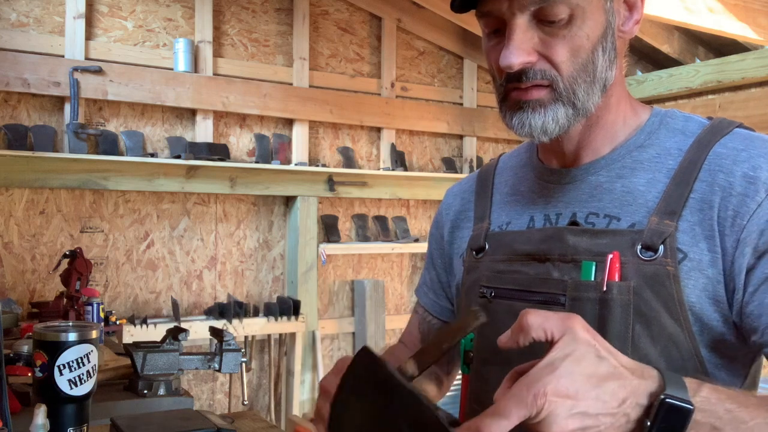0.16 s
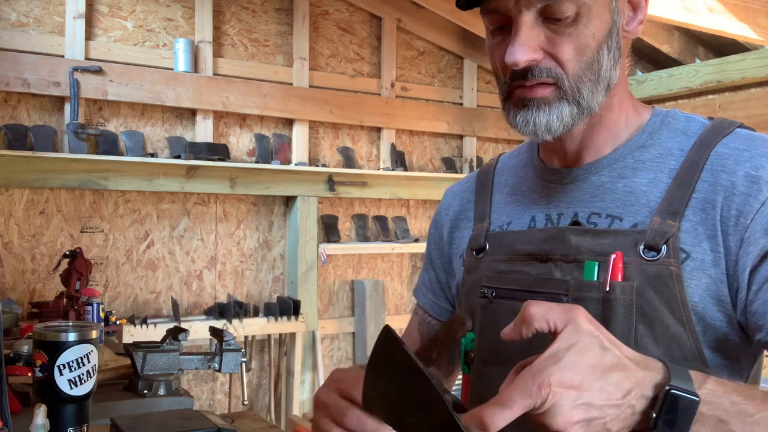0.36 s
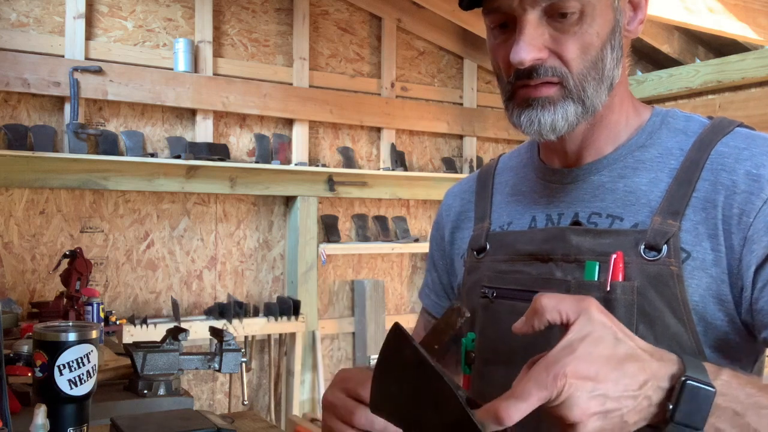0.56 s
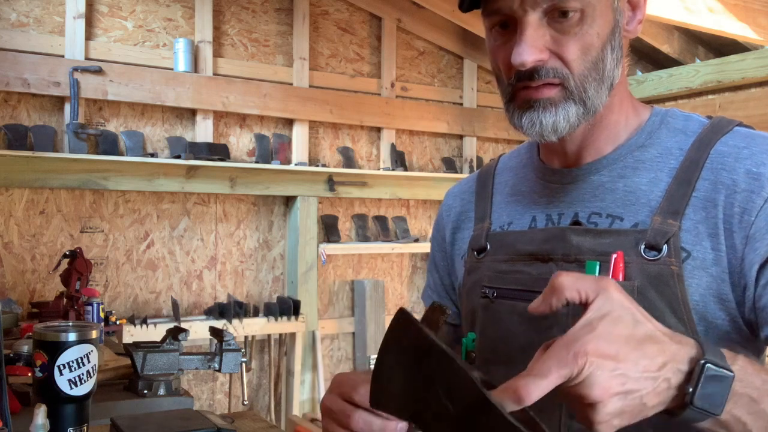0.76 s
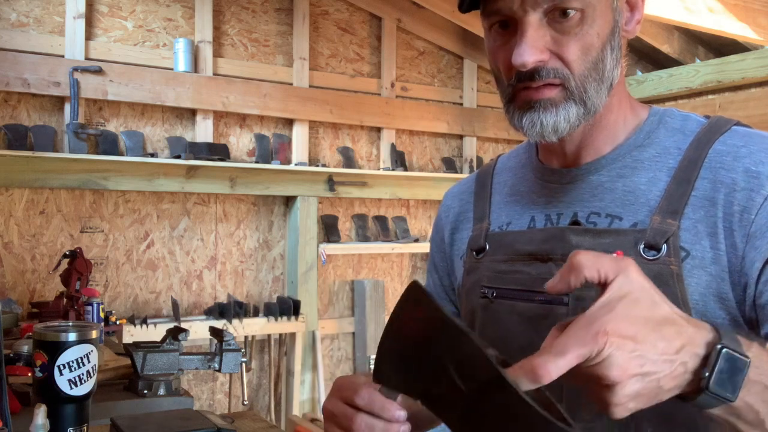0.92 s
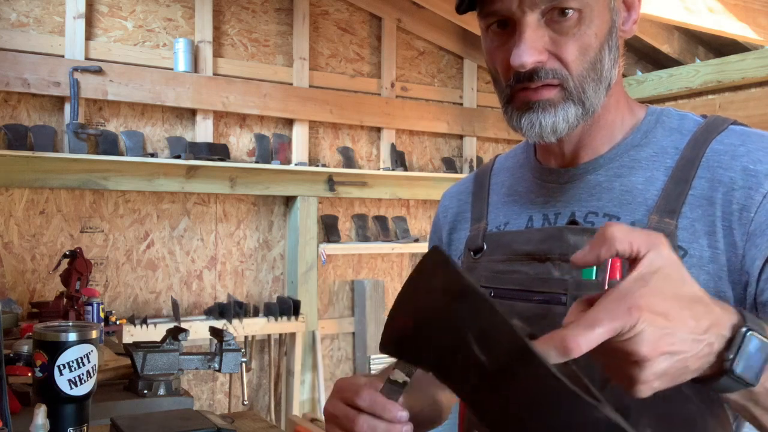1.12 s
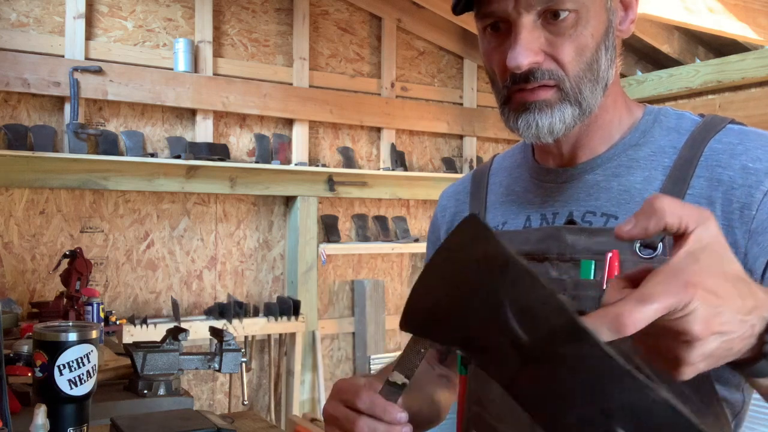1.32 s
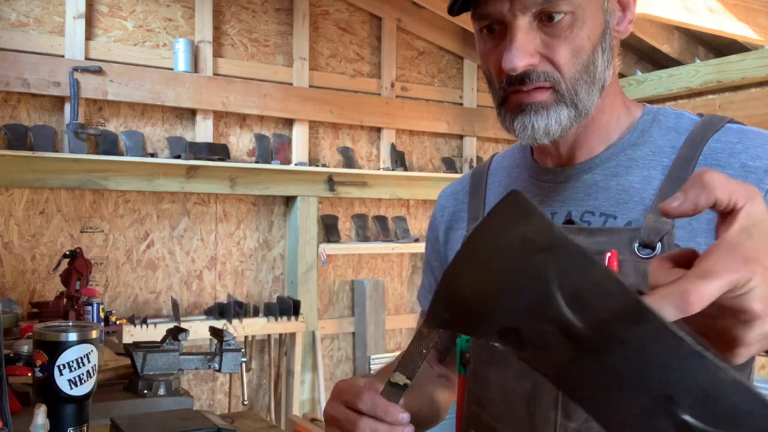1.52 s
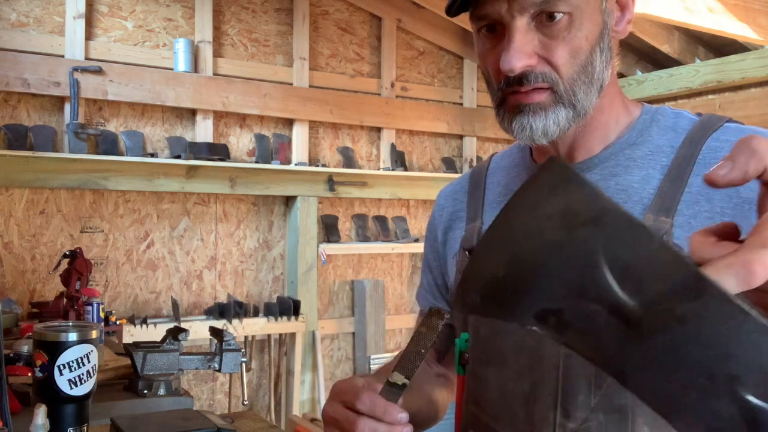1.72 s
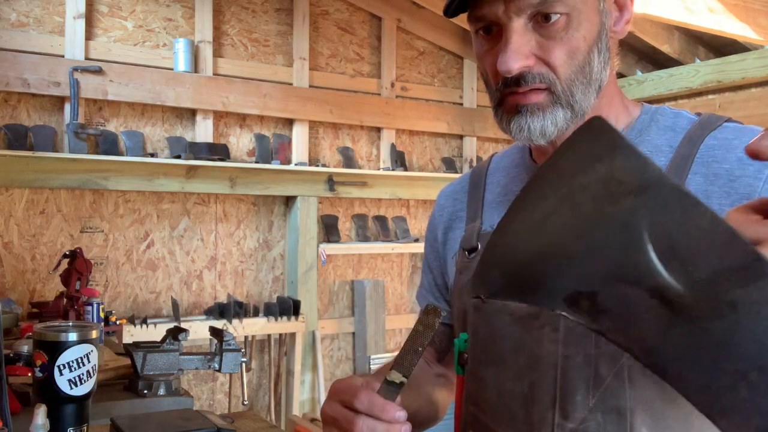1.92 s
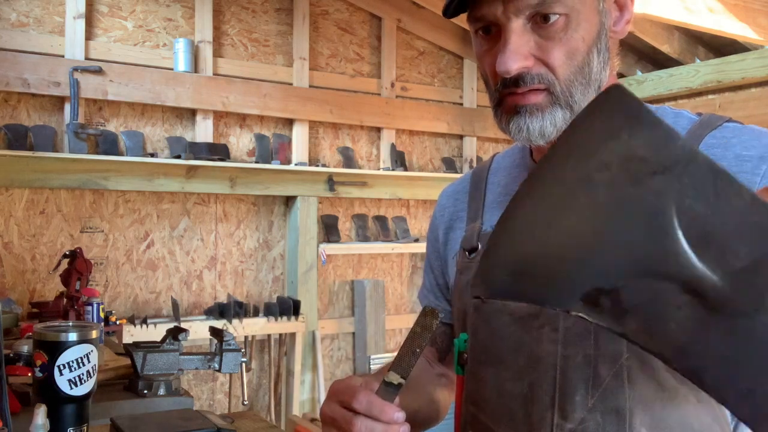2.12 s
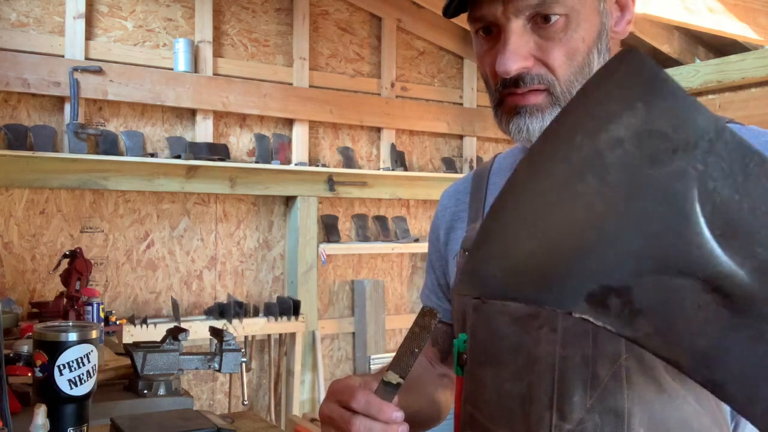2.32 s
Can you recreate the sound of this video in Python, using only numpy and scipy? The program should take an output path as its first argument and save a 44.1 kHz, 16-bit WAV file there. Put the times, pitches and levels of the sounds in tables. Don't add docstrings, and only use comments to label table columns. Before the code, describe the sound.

A bare steel axe head rings from a single fingernail flick. Low workshop rumble, hum and the last trace of an older ring come first. A brief rising scrape ends in a crisp crack at 0.2 seconds. Bright overtones die quickly, damped after 0.55; one pure high tone swells around 0.7, dips near 1.1, then wavers and shifts sideways, fading. Cloth brushes softly at 2.1.

```python
import sys
import numpy as np
from scipy import signal
from scipy.fft import rfft, irfft
from scipy.io import wavfile
from scipy.ndimage import uniform_filter1d

SR = 44100
rng = np.random.default_rng(int(sys.argv[2]) if len(sys.argv) > 2 else 0)


def dump(signal):
    limited = np.clip(np.atleast_2d(signal).T, -1, 1)
    pcm = np.round(limited * 32767).astype(np.int16)
    wavfile.write(sys.argv[1], SR, pcm)


def boost(x):
    u = np.asarray(x, float) / 20
    return 10 ** u


N = 110250
T = np.arange(N) / SR
SIDES = np.array([[.5], [-.5]])
STRIKE_S, CONTACT_S = .2172, 0.0004

# (centre [Hz], width [Hz], crack level [dB], tail level [dB], tail t60 [s])
CROWDS = [(171.1, 140, -33.5, -65.5, .08), (549, 60, -58, -69, 0.21), (1279.4, 440, -46, -55, .35),
          (2030, 400, -37.5, -49.5, .4), (2950, 300, -34.5, -56, 0.66), (4534, 450, -26, -38.5, 0.551),
          (5520, 430, -27, -46.5, 0.64), (6564, 600, -24, -45, .52), (7300, 410, -24.5, -45.5, 0.52),
          (9440, 730, -23, -38, .3), (10700, 400, -25, -47, 0.16), (11500, 540, -20.5, -46, .2),
          (13100, 800, -21.5, -42, 0.18), (14100, 400, -36, -48.5, 0.14), (14900, 1000, -41, -82.5, .02)]


def rms_one(x):
    return x / np.sqrt(np.mean(x ** 2) + 1e-20)


def in_time(rows, smooth_s=0.038):
    s, *columns = np.transpose(rows)
    return [uniform_filter1d(np.interp(T, s, c), size=int(smooth_s * SR)) for c in columns]


def at_hz(points, hz):
    table_hz, values = np.transpose(points)
    return np.interp(np.log(hz), np.log(table_hz), values)


def band(x, low_hz, high_hz):
    edges_hz = [max(low_hz, 20), min(high_hz, .49 * SR)]
    return signal.sosfilt(signal.butter(2, edges_hz, "band", fs=SR, output="sos"), x)


def stereo(mid, side, alike):
    alike = np.clip(alike, -1, 1)
    return np.sqrt(1 + alike) * mid + np.sqrt(1 - alike) * side * [[1], [-1]]


def coloured(spectrum, likeness):
    hz = np.maximum(np.arange(N // 2 + 1) * SR / N, 10)
    mid, side = rfft(rng.standard_normal((2, N)))
    both = boost(at_hz(spectrum, hz)) * stereo(mid, side, at_hz(likeness, hz))
    return rms_one(irfft(both, N))


def crowd(hz, width_hz, alike):
    mid, side = rng.standard_normal((2, N))
    x = band(stereo(mid, side, alike), hz - width_hz / 2, hz + width_hz / 2)
    return rms_one(band(x, hz - width_hz, hz + width_hz))


def tone(hz, level_db, pan_db, lead):
    phase = 2 * np.pi * hz * (T - STRIKE_S) + lead * SIDES
    return np.sqrt(2) * boost(level_db + pan_db * SIDES) * np.sin(phase)


def dying(t60):
    since = np.maximum(T - STRIKE_S, 0)
    rise = np.sin(np.pi / 2 * np.minimum(since / CONTACT_S, 1)) ** 2
    return rise * boost(-60 * since / t60)


def workshop():
    # (frequency [Hz], level per Hz [dB])
    rumble = [(12, -45), (20, -20), (92, -8.5), (124, 2.5), (146, -13), (241, -15.5), (302, -25),
              (370, -23), (1700, -49), (2210, -87), (3740, -120)]
    hiss = [(1800, -1.5), (3000, -16.5), (4600, -4.5), (6000, -7.5), (7300, 1), (9000, -18), (11500, -4.5),
            (15500, -21.5)]
    # (frequency [Hz], width [Hz], level [dB])
    hum_bands = [
        (60, 27, -63.5),
        (117.94, 32, -62.5),
        (239.26, 8, -72.5),
    ]
    # (frequency [Hz], left-right likeness [-1 to 1])
    likeness = [(60, .9), (130, .9), (290, .5), (640, -0.61), (1400, .1), (5000, .1), (9000, -0.59),
                (13000, 0.68)]
    hum = 0
    for hz, width_hz, db in hum_bands:
        noise = rng.standard_normal(N + SR)
        hum = hum + boost(db) * rms_one(band(noise, hz - width_hz / 2, hz + width_hz / 2)[SR:])
    low = boost(-58) * coloured(rumble, likeness) + hum
    return low * boost(-2.0 * SIDES) + boost(-80.5) * coloured(hiss, likeness)


def long_ring():
    # (time [s], level [dB], left-right [dB])
    earlier = [
        (0, -64, 5),
        (.08, -69.5, 10.5),
        (.21, -78.5, 2.5),
    ]
    # (time [s], level [dB], left-right [dB])
    turn_path = [(0.24, -43.5, -5.5), (0.33, -47, -2), (0.46, -33, -1.5), (0.55, -29.5, -4.0),
                 (0.7, -27, -3.0), (0.87, -29.5, -3.0), (0.97, -33, -1.5), (1.11, -44.5, 12),
                 (1.18, -42, -3.5), (1.26, -42, -7.5), (1.37, -47.5, -10), (1.48, -44.5, 4),
                 (1.62, -42.5, 4.0), (1.76, -48.5, 7), (1.91, -51, -1.5), (2.17, -63.5, -4.5),
                 (2.28, -56, 8.0), (2.5, -55, 2.5)]
    # (time [s], left lead [rad])
    lead_path = [(.2, .9), (1.05, 1.0), (1.14, -.3), (1.45, -.3), (1.68, 1.0), (1.84, 2.6), (1.9, 3.1),
                 (2.0, 3.5), (2.08, 2.7), (2.16, 2.3), (2.28, 0.), (2.5, 0.)]
    ring_hz = 2144.1
    old_db, old_pan = in_time(earlier)
    db, pan = in_time(turn_path)
    lead, = in_time(lead_path)
    old_ring = tone(ring_hz, old_db, old_pan, 1.9)
    return np.where(T < STRIKE_S, old_ring, tone(ring_hz, db, pan, lead))


def nail_drag():
    # (centre [Hz], width [Hz], level [dB], left-right [dB])
    scrape = [
        (2500, 1200, -47, -6),
        (4683, 850, -31, -4.5),
        (7345, 450, -31, 1.5),
    ]
    rise_s = 0.12
    since = T - STRIKE_S
    touch_down = np.clip(since / 0.0043 + 4, 0, 1)
    swell = (since < 0) * boost(60 * np.minimum(since, 0) / rise_s) * touch_down
    return swell * sum(boost(db + pan * SIDES) * crowd(hz, width_hz, 0) for hz, width_hz, db, pan in scrape)


def contact_crack():
    hold_s, t60_s = 0.0096, .015
    since = T - STRIKE_S
    burst = np.clip(since / CONTACT_S, 0, 1) * boost(-60 * np.maximum(since - hold_s, 0) / t60_s)
    return burst * sum(boost(crack_db) * crowd(hz, 0.77 * width_hz, .3)
                       for hz, width_hz, crack_db, _, _ in CROWDS)


def room_answer():
    tail = sum(boost(tail_db) * dying(t60) * crowd(hz, width_hz, .3)
               for hz, width_hz, _, tail_db, t60 in CROWDS)
    return signal.sosfilt(signal.cheby2(8, 50, 14600, fs=SR, output="sos"), tail)


def short_modes():
    head_hz = [540, 1709, 1891, 3137, 4535, 4590, 5496, 6570, 8975, 9455, 11062, 11477, 13372, 13772]
    bit_hz = [2800, 3913, 4492, 4950, 6970, 7614, 10592, 11481, 12578, 14250]
    # (level [dB], t60 [s], left-right
    # [dB], left lead [rad])
    steel_modes = [(-55.5, 0.23, -7, -1.3), (-52.5, 3.4, 1, 1.19), (-39.5, 0.73, 3.5, -0.3),
                   (-43.5, 0.68, 4, 0.5), (-40, 0.33, -5, .6), (-40.5, 0.35, -3, -0.67),
                   (-23, 0.27, -1, -5.14), (-30, 0.43, -4.5, -2), (-37.5, 0.25, -3, 3.5),
                   (-33.5, 0.25, -10.5, 9), (-32, 0.33, -5.5, -0.04), (-30.5, 0.67, 9, 3.82),
                   (-30, .3, -1.5, 1.4), (-37.5, 0.3104, 6, 0.6),
                   (-54.5, .25, 2, 0.34), (-46, .25, -2.5, .4), (-34.5, .3, 8.5, 0.26), (-58, 0.27, 2.5, .3),
                 (-34, .22, 3, .3), (-47.5, 0.26, 0.5, 0.42), (-38, .21, -10, .3), (-23.5, 0.31, -5.5, .7),
                 (-39.5, .12, -1, .3), (-48, .15, -5.5, .3)]
    room_db, room_t60_s = -13, 0.41
    grip_s, grip_db_s = 0.54, 131.5
    steel = 0
    for hz, (db, t60, pan, lead) in zip(head_hz + bit_hz, steel_modes):
        steel = steel + tone(hz, db, pan, lead) * dying(t60)
    s = T[:SR // 2]
    echoes = rng.standard_normal((2, len(s))) * boost(-60 * s / room_t60_s)
    echoes = echoes * (s > .004)
    echoes = echoes / np.sqrt(np.sum(echoes ** 2, axis=1, keepdims=True))
    wet = steel + boost(room_db) * signal.fftconvolve(steel, echoes, axes=1)[:, :N]
    return wet * boost(-grip_db_s * np.maximum(T - grip_s, 0))


def cloth():
    since = T - 2.125
    stroke = np.exp(-(since / .035) ** 4)
    skirt = 0.75 * np.exp(-(since / 0.049) ** 2)
    return boost(-72) * (stroke + skirt) * crowd(1300, 700, 0)


def scene():
    flick = nail_drag() + contact_crack() + room_answer()
    return workshop() + long_ring() + flick + short_modes() + cloth()


def low_pass(x):
    return signal.sosfilt(signal.butter(12, 16800, fs=SR, output="sos"), x)


def record(dry):
    knee_db, share, release_db_s, attack_s = -55, .36, 200, .012
    bright = signal.sosfilt(signal.butter(6, 4000, "high", fs=SR, output="sos"), dry)
    power = uniform_filter1d(np.mean(bright ** 2, axis=0), size=400, origin=199)
    level_db = 10 * np.log10(power + 1e-12)
    held_db = np.maximum.accumulate(level_db + release_db_s * T) - release_db_s * T
    r = np.exp(-1 / (attack_s * SR))
    cut_db = signal.lfilter([1 - r], [1, -r], share * np.maximum(held_db - knee_db, 0))
    bass = signal.sosfiltfilt(signal.butter(2, 450, fs=SR, output="sos"), dry)
    mix = dry - bass * (1 - boost(-cut_db))
    return low_pass(mix)


dry = scene()
out = record(dry)
dump(out)
```